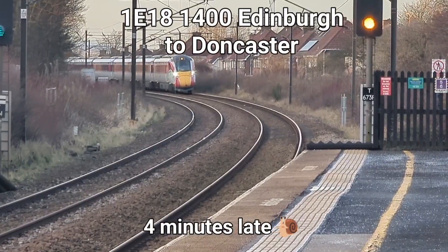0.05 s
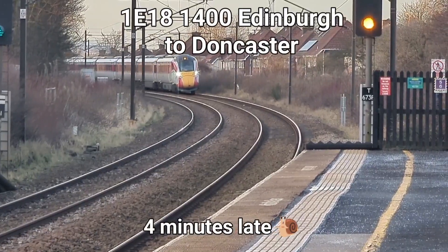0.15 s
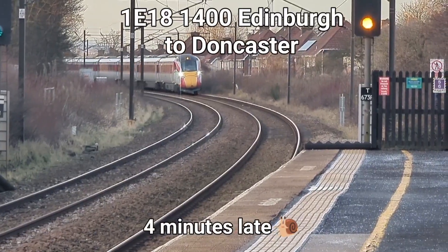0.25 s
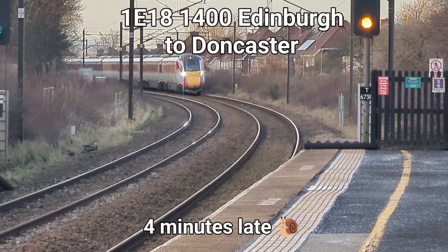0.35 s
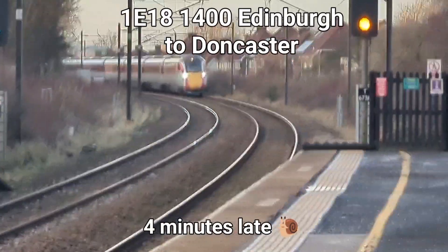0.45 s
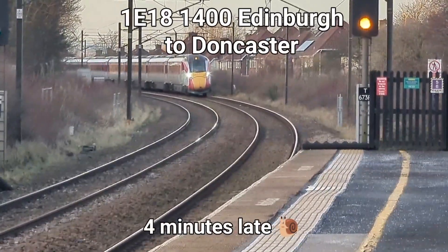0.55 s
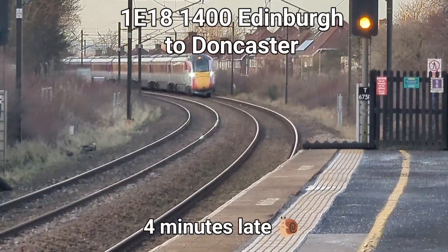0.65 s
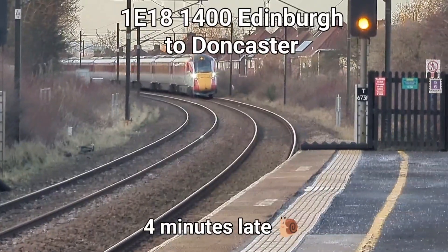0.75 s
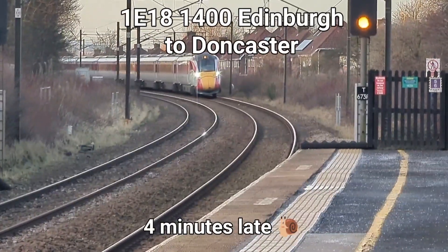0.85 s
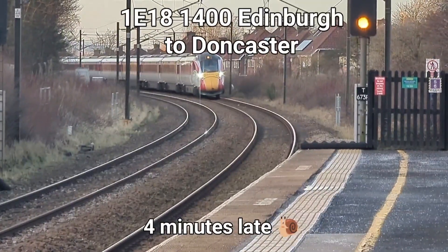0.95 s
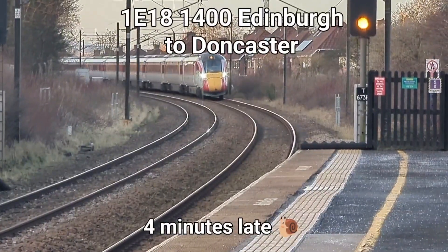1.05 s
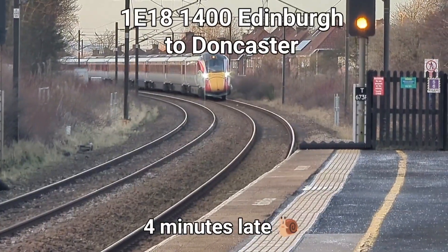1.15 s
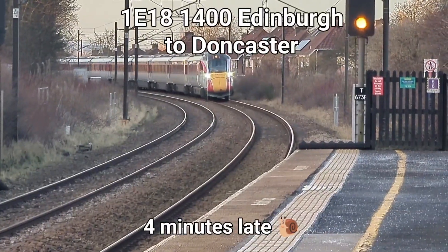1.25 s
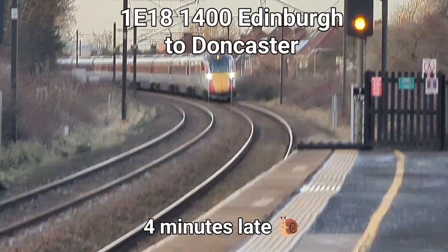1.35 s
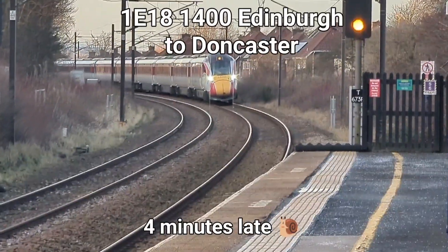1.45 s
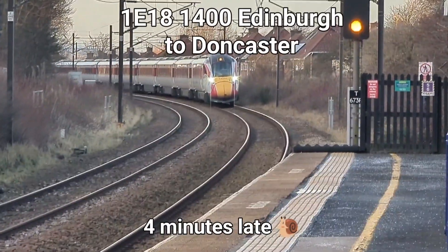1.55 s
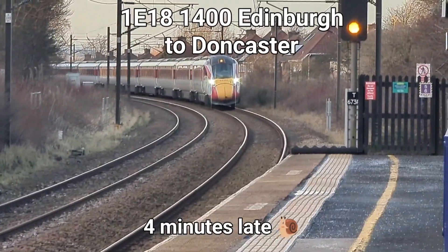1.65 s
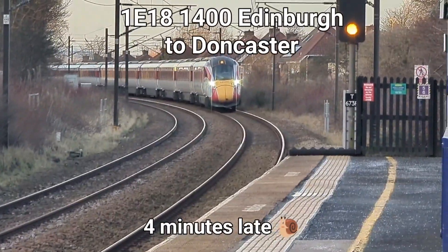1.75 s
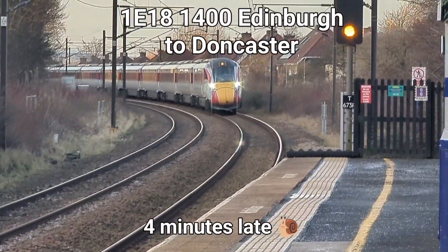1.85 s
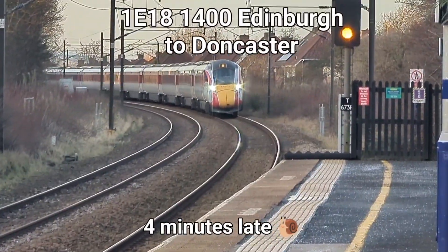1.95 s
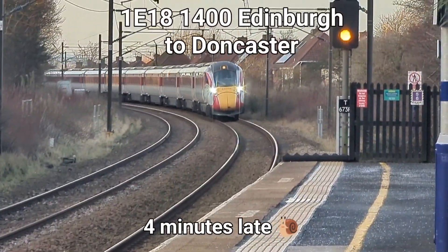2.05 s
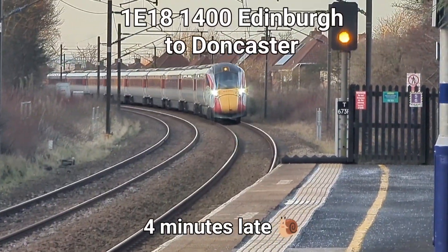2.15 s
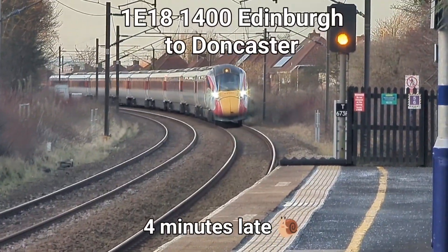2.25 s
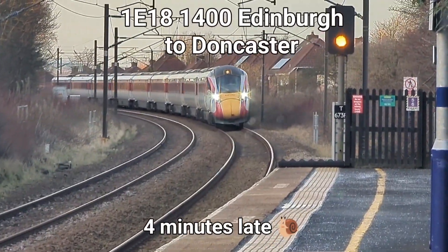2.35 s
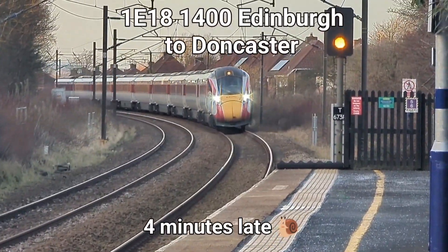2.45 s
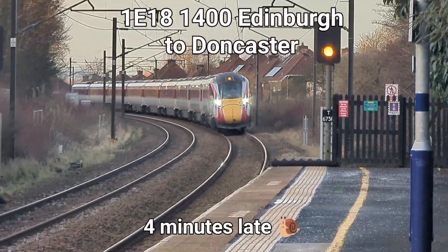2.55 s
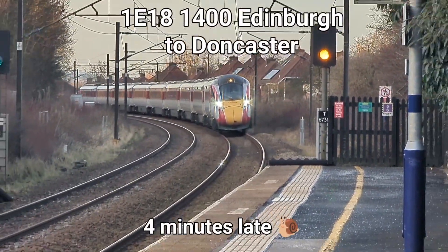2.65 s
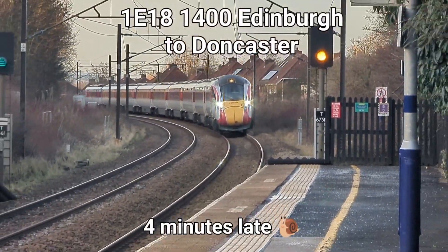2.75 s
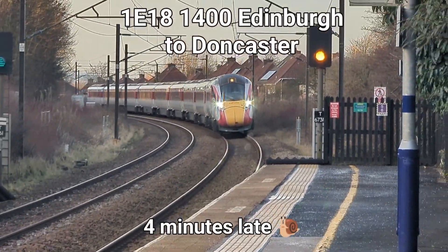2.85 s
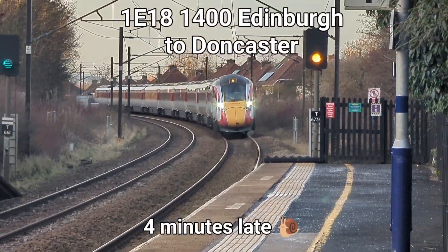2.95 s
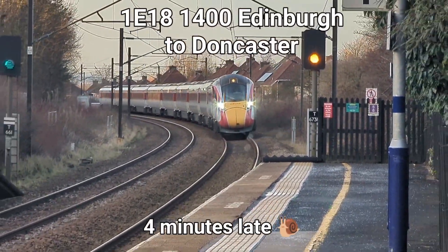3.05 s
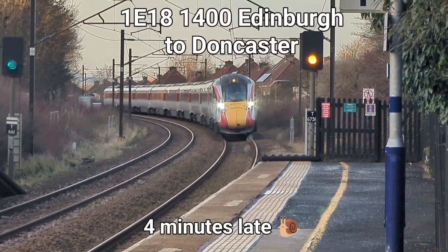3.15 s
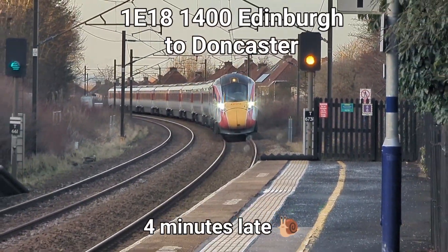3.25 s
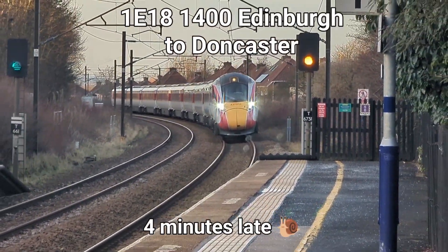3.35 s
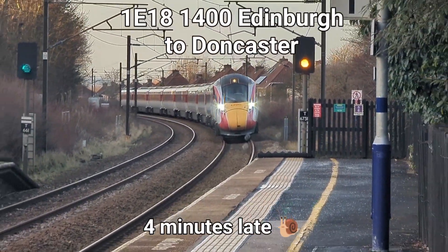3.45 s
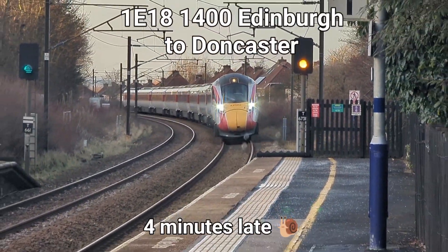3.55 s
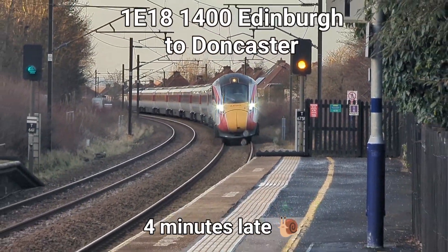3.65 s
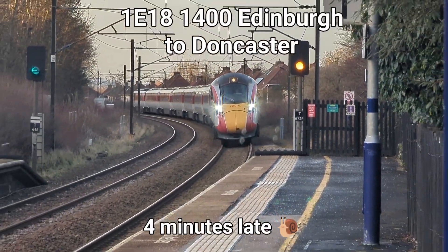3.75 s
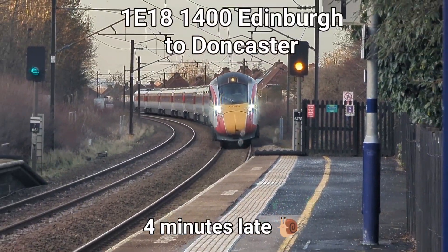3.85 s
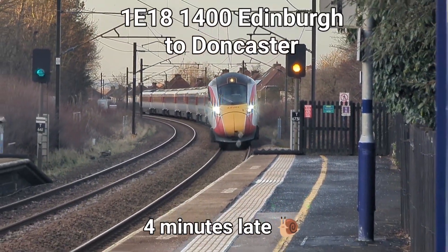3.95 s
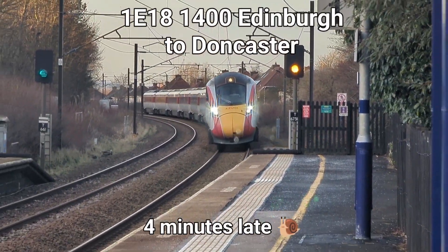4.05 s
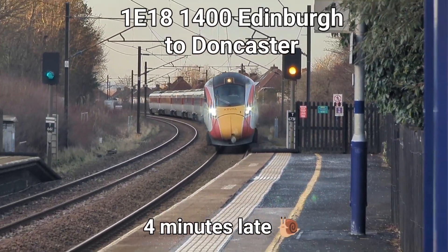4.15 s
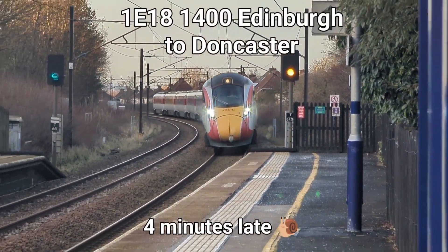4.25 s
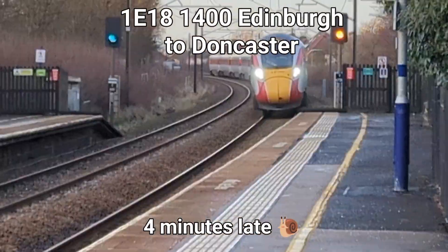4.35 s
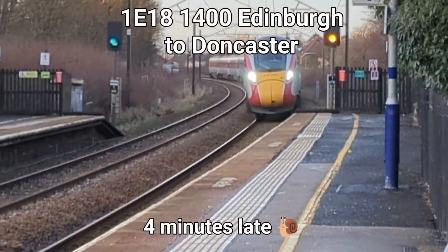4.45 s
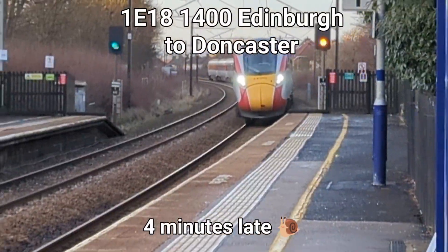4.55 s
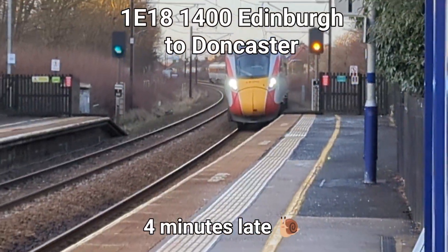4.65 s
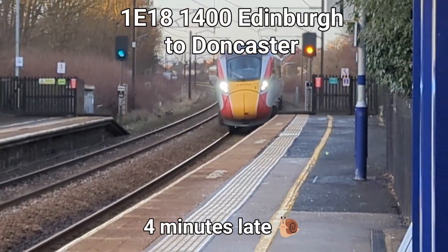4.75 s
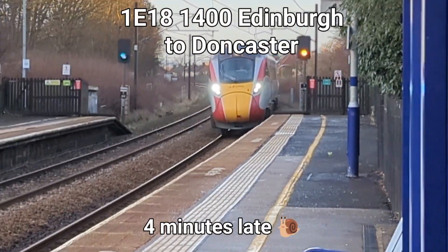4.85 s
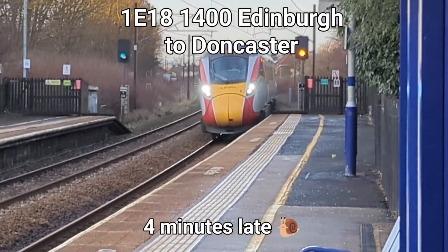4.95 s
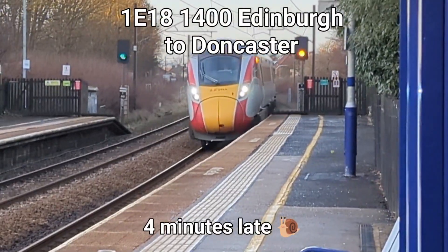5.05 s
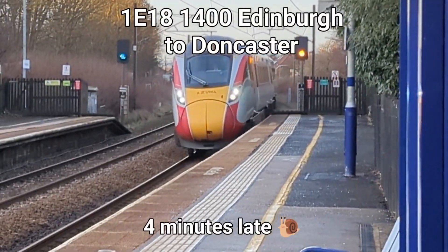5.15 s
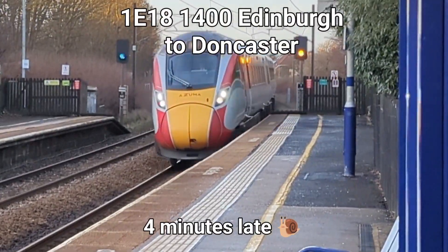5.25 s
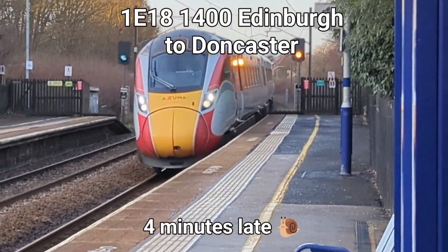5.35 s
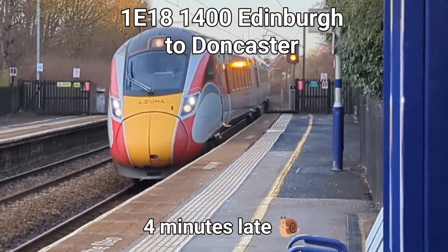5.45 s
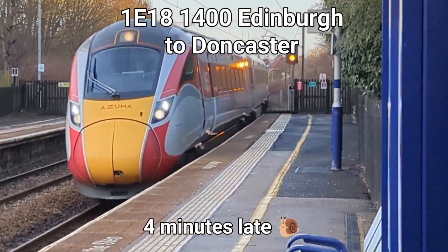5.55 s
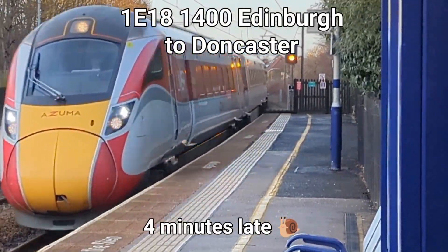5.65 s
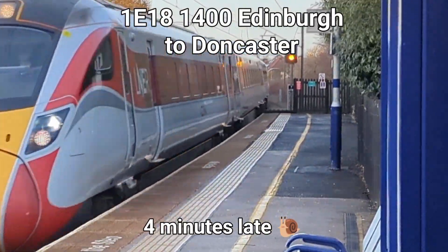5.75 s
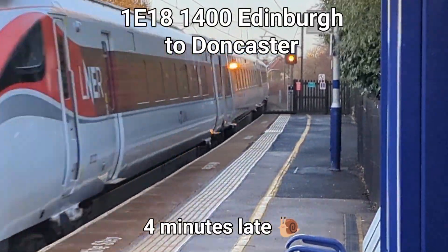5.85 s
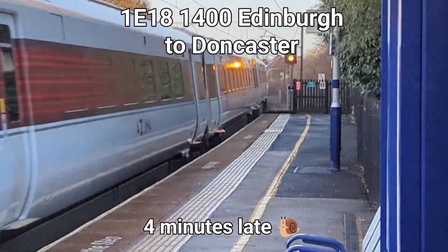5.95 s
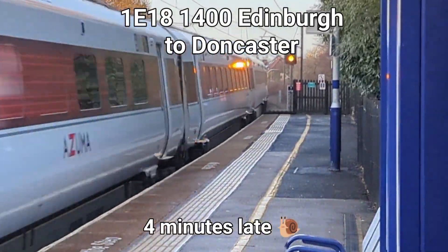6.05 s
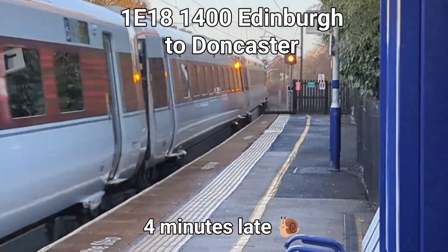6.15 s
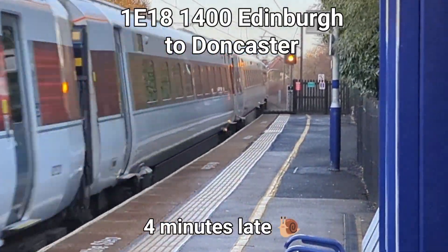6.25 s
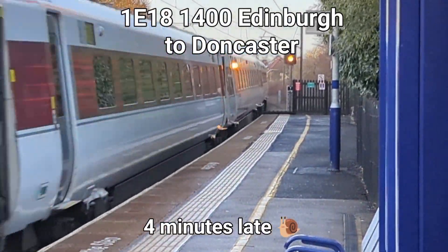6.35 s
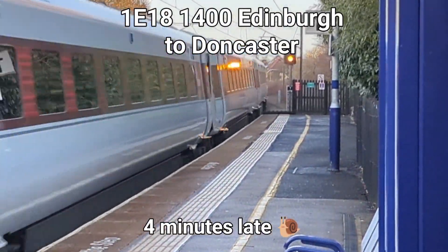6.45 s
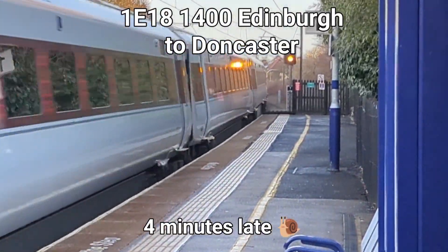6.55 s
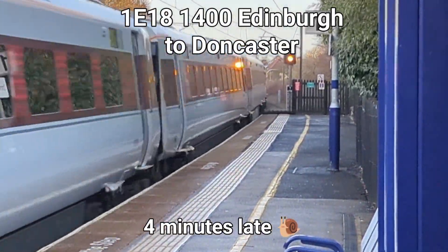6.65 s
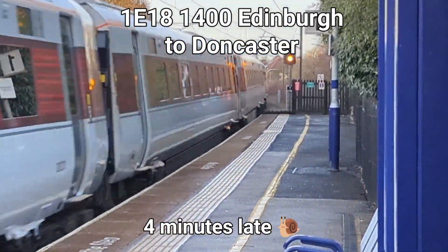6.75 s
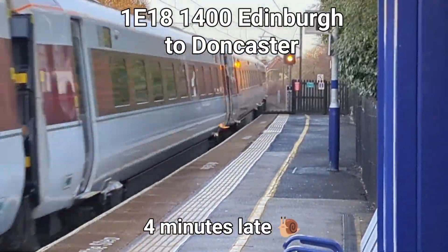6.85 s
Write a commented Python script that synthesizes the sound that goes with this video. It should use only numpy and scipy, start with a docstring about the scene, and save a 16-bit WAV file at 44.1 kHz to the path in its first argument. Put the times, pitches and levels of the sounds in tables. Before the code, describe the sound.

On an outdoor station platform, a phone picks up two steady hums around 250 Hz, beating about seven times a second, over faint low wind and a far train. A sharp dry tick falls at 0.4 s, smaller ones follow; a tiny bird whistles downward near 0.9 s and trills softly from 1.2 to 1.9 s. At 2.3 s the distant rumble suddenly opens up, clearer. Thin high rail singing emerges, strengthening from 3.5 s; the bird glides again at 3.7 and 3.9 s. Hiss and wheel roar climb steeply, with deep gusts from 4 s and brief metallic rings after 5 s. Around 5.7-5.8 s the nose passes in a broad whoosh with two hard knocks. Until nearly 7 s coaches rush alongside: loud roar, bright steely hiss swelling with the wheels, heavy bass buffets and short rings sagging in pitch. It ends with the train still passing.

```python
"""An express train runs through a station, close to a phone on the platform.
Two fans hum and beat throughout as sines; low air rumbles, early on as wind buffeting the phone.
Short noise blows tick near the phone and a bird whistles in glides. The rails, narrow noise resonances,
sing ahead of the train; its distant sound suddenly opens up, probably the phone's audio zoom.
Then the nose whooshes by, wheels roar, steel hisses, and wheels and track ring, all shaped noise."""
import sys
import numpy as np
from scipy import signal
from scipy.fft import rfft, irfft
from scipy.io import wavfile
from scipy.ndimage import uniform_filter1d, minimum_filter1d

SR = 44100
rng = np.random.default_rng(int(sys.argv[2]) if len(sys.argv) > 2 else 0)


def store_pcm(level_fs):
    """Save levels as 16-bit WAV."""
    pcm = np.round(np.clip(level_fs, -1, 1) * 32767).astype(np.int16)
    wavfile.write(sys.argv[1], SR, np.atleast_2d(pcm).T)


N = 304290
T = np.arange(N) / SR
F = np.maximum(np.fft.rfftfreq(N, 1 / SR), 1)

# Where the train is. Each row: time in seconds, nearness (0 far off, 1 approaching, 2 alongside).
NEARNESS = [(0, 0.025), (2.28, 0.083), (2.4, 0.57), (4.0, 0.89), (5.4, 1.043), (5.95, 1.9), (6.9, 1.94)]
# Likeness of the two microphone ports, train ahead and alongside.
# Each row: frequency in Hz, in-phase share, share with left leading.
PORTS_AHEAD = [(60, 1, 0.076), (282, 0.97, -0.075), (520, 0.82, -0.092), (770, 0.78, 0.19),
               (990, 0.1, -0.08), (1220, -0.12, 0.62), (1500, 0.39, 0.89), (1850, 0.35, -0.081),
               (2230, 0.55, 0.17), (2860, -0.23, 0.85), (3500, 0.045, 0.43), (4590, 0.64, -0.28),
               (7550, 0.029, 0.0006)]
PORTS_BESIDE = [(60, 1, 0.084), (275, 0.96, 0.16), (523, 0.57, 0.19), (790, 0.098, 0.21),
                (1050, -0.29, 0.17), (1210, -0.88, 0.46), (1500, -0.25, 0.25), (1850, 0.31, 0.1),
                (2180, 0.65, 0.14), (2720, -0.47, 0.099), (3500, 0.15, 0.18), (4600, -0.26, 0.17),
                (7500, 0.055, 0.1)]
ARRIVES_S = 5.7  # the nose draws level


def undb(db):
    """Decibels to gain."""
    return 10 ** (np.asarray(db) / 20)


def unit(x):
    """Scale to rms 1."""
    return x / np.sqrt(np.mean(x ** 2))


def curves(table):
    """Each column of a time table, sample by sample."""
    s, *columns = np.transpose(table)
    return [np.interp(T, s, c) for c in columns]


def over_hz(table):
    """Each column of a frequency table, bin by bin, linear over log frequency."""
    hz, *columns = np.transpose(table)
    return [np.interp(np.log(F), np.log(hz), c) for c in columns]


def colour(table):
    """Gain per bin of a dB spectrum."""
    return undb(over_hz(table)[0])


def band(lo_hz, hi_hz, order=20, bins=F):
    """Gain of a steep band-pass."""
    low_cut = 1 + (lo_hz / bins) ** order
    high_cut = 1 + (bins / hi_hz) ** order
    return (low_cut * high_cut) ** -.5


def resonance(hz, width_hz):
    """Gain of a resonance with steep skirts."""
    return 1 / (1 + ((F - hz) / width_hz) ** 2 * 2)


def bell(s, half_s):
    """A swell that peaks at time s."""
    return np.exp(-((T - s) / half_s) ** 2)


def walk(rate_hz):
    """Smooth chance of rms 1 that changes about rate_hz times a second."""
    smooth = rfft(rng.standard_normal(N)) / (1 + (F / rate_hz) ** 4)
    return unit(irfft(smooth, N))


def power_sum(*levels_db):
    """Level of unrelated sounds heard together."""
    return 20 * np.log10(np.sqrt(sum(undb(db) ** 2 for db in levels_db)))


def add(out, s, sound):
    """Mix a short sound in at time s."""
    part = out[int(s * SR):][:len(sound)]
    part += sound[:len(part)]


def field(gain, ports):
    """Coloured noise at both ports, partly alike and partly out of step; their mean has rms 1."""
    same, leading = over_hz(ports)
    likeness = same - 1j * leading
    likeness = likeness / np.maximum(np.abs(likeness), 1)
    left, other = rfft(rng.standard_normal((2, N)))
    right = likeness * left + np.sqrt(np.maximum(1 - np.abs(likeness) ** 2, 0)) * other
    mean_gain = np.sqrt(np.maximum(1 + same, .1))
    pair = irfft(np.array([left, right]) * gain / mean_gain, N)
    return pair / pair.mean(0).std()


def approach(far, ahead, beside):
    """Noise whose colour and width crossfade as the train draws near."""
    near, = curves(NEARNESS)
    stages = field(far, PORTS_AHEAD), field(ahead, PORTS_AHEAD), field(beside, PORTS_BESIDE)
    return sum(np.sqrt(np.clip(1 - np.abs(near - k), 0, 1)) * x for k, x in enumerate(stages))


def steady(x, size):
    """Take the slow swells out of a noise; size is in samples."""
    return x / np.sqrt(uniform_filter1d(x.mean(0) ** 2, size) + 1e-9)


def echoes(echo_db, count=8):
    """Spectral ripple that early reflections from platform, fence and coach sides leave."""
    lags_s = rng.uniform(.004, .03, count)
    return np.abs(1 + undb(echo_db) * np.exp(-2j * np.pi * lags_s[:, None] * F).sum(0))


def past_opening():
    """0 before the distant sound opens up, 1 after it; probably the phone's audio zoom."""
    opening_s, opening_length_s = 2.31, 0.067
    return np.clip((T - opening_s) / opening_length_s + .5, 0, 1)


def passing(far_db, opening_db, beside_db, doubling_db, bump_db, bump_s, bogie_db):
    """Train level: rises per halving of distance, rises or dips around bump_s, ripples once a coach."""
    speed_m_s, track_m, coach_m = 57, 19.5, 25.9
    bump_half_s, ripple_origin_s = 0.4, 4.5  # the origin sets the phase of the coach ripple
    distance_m = np.hypot(speed_m_s * np.maximum(ARRIVES_S - T, 0), track_m)
    bogies = np.cos(2 * np.pi * (T - ripple_origin_s) * speed_m_s / coach_m)
    bogies = bogies * np.clip((T - ARRIVES_S) / bump_half_s + 1, 0, 1)
    train_db = beside_db - doubling_db * np.log2(distance_m / track_m)
    train_db = train_db + bump_db * bell(bump_s, bump_half_s) + bogie_db * bogies
    return power_sum(far_db, train_db) - opening_db * (1 - past_opening())


def along_rail(full_db, rise_db_per_s, full_s):
    """Rails damp sound evenly per metre, so its level climbs evenly in dB as the wheels close in."""
    return full_db - rise_db_per_s * np.maximum(full_s - T, 0)


def fans():
    """Two fans at nearly the same speed: their blade tones beat about seven times a second."""
    # Blade tones. Each row: time in seconds, pitch of either fan in Hz.
    fan_pitch = [(0, 248.35, 255.02), (1.5, 248.35, 255.02), (2, 248.35, 255.33), (3.5, 248.35, 255.33),
                 (4, 248.35, 255.02)]
    # Mean rms levels. Each row: time in seconds, level of either fan in dB.
    fan_levels = [(0, -41, -35.5), (0.601, -37.5, -35.5), (1.2, -46, -35), (1.7, -38, -37),
                  (2.2, -40.5, -34.5), (2.8, -36.5, -39), (3.5, -34, -36), (5, -32.5, -39.5)]
    in_step_s = .11  # both swing together, but for the wander
    lag_s = np.array([[0], [.00018]])  # the right port hears them later
    out = 0
    for hz, db in zip(curves(fan_pitch), curves(fan_levels)):
        phase = 2 * np.pi * (np.cumsum(hz) / SR - hz * (in_step_s + lag_s)) + 0.27 * walk(5.1)
        out = out + np.sqrt(2) * undb(db + 0.78 * walk(2.0)) * np.cos(phase)
    return out


def trill(count):
    """Short rising notes, on average each lower and softer, scattered in pitch and strength."""
    start_s, step_s, note_s = 1.24, .088, .032
    first_hz, rise_hz, sag_hz, scatter_hz = 5950, 750, 60, 120
    first_db, fade_db, scatter_db = -60.5, 1.5, 3
    notes = []
    for k, (off, strength) in enumerate(rng.standard_normal((count, 2))):
        hz = first_hz - k * sag_hz + scatter_hz * off
        db = first_db - k * fade_db + scatter_db * strength
        notes.append((start_s + k * step_s, note_s, hz, hz + rise_hz, db))
    return notes


def bird():
    """Thin gliding notes of a small bird, with a short scatter from the fence and trees."""
    # Whistles. Each row: start in seconds, length in seconds, start and end pitch in Hz,
    # peak level in dB ahead of the direct/scatter mix.
    whistles = [(0.867, 0.07, 8720, 8370, -61), (1.045, 0.097, 8600, 8150, -57),
                (1.09, 0.043, 7550, 7900, -56), (3.702, 0.11, 8750, 7950, -52),
                (3.93, 0.077, 8650, 8200, -51)]
    song = np.zeros(N)
    for s, length_s, start_hz, end_hz, db in whistles + trill(count=8):
        u = np.linspace(0, 1, int(length_s * SR))
        phase = 2 * np.pi * np.cumsum(start_hz + (end_hz - start_hz) * u) / SR
        swell = np.sqrt(np.abs(np.sin(np.pi * u)))
        add(song, s, undb(db) * swell * np.sin(phase))
    tail = rng.standard_normal((2, SR // 2)) * np.exp(-T[:SR // 2] / 0.056)
    tail = tail / np.sqrt((tail ** 2).sum(1, keepdims=True))
    scatter = signal.fftconvolve(song[None], tail, axes=1)[:, :N]
    return 0.68 * song + 0.97 * scatter


def ticks(size=4096):
    """Short dry blows, band-passed decaying noise: ticks near the phone, then leading-bogie knocks."""
    # Each row: time in seconds, peak in dB, low and high band edge in Hz, 60 dB decay in seconds.
    blows = [(.4209, -18, 2300, 10500, .004), (.624, -37, 3000, 14500, .003),
             (.659, -31, 3000, 15000, .003), (1.449, -23, 400, 2000, .012), (2.003, -35, 2650, 3250, .01),
             (5.772, -12, 1900, 2350, .03), (5.821, -14, 870, 1150, .04)]
    out = np.zeros(N)
    t = (np.arange(size) - size // 2) / SR
    bins = np.maximum(np.fft.rfftfreq(size, 1 / SR), 1)
    for s, db, lo_hz, hi_hz, t60_s in blows:
        burst = rng.standard_normal(size) * (t >= 0) * undb(-60 * np.abs(t) / t60_s)
        burst[size // 2] += 5  # the sharp first contact
        blow = irfft(rfft(burst) * band(lo_hz, hi_hz, order=14, bins=bins), size)
        add(out, s + t[0], undb(db) * blow / np.abs(blow).max())
    return out


def rails():
    """Waves run far ahead of the wheels in the rails, which sing in narrow resonances."""
    # Main whine. Each row: time in seconds, level in dB ahead of screening and flicker.
    whine_levels = [(1.9, -93), (2.43, -80), (3.51, -67), (3.56, -51.5), (3.83, -53), (3.88, -63),
                    (4.0, -49.5), (4.75, -44.5), (5.3, -42), (5.9, -49)]
    # Upper partials. Each row: pitch in Hz, width in Hz, relative power in dB.
    partials = [(4260, 70, -1), (4900, 80, -5), (6900, 70, -7), (7980, 110, -1), (8660, 60, -2),
                (9320, 85, 1), (9970, 55, -5), (10660, 75, -3), (11300, 75, 2), (11985, 65, 0),
                (12680, 75, -4), (13310, 55, 0), (13960, 55, -2), (14620, 65, -3), (15300, 50, -13)]
    whine_db, = curves(whine_levels)
    near, = curves(NEARNESS)
    covered = np.clip(near - 1, 0, 1)  # the coaches screen the main whine once alongside
    whine = steady(field(resonance(7330, width_hz=26), PORTS_AHEAD), size=4000)
    whine = whine * undb(whine_db - 5.2 * covered + 2.8 * walk(22))

    upper_db = along_rail(full_db=-43, rise_db_per_s=10, full_s=5.12) - 6 * (1 - past_opening())
    comb = np.sqrt(sum((undb(db) * resonance(hz, width)) ** 2 / width for hz, width, db in partials))
    # the highest partials lead at first; the lower ones take over as the train comes closer
    lead_db = np.interp(T, [2.6, 4.4], [1.5, -1.5])
    high = field(comb * band(11800, 16000), PORTS_AHEAD) * undb(lead_db + 2 * walk(9))
    low = field(comb * band(4000, 13600), PORTS_AHEAD) * undb(-lead_db + 2 * walk(13))
    return whine + (high + low) * undb(upper_db)


def gusts():
    """Gusts of low rumble: each is a few wavering cycles of a deep boom that swell and die."""
    # Each row: middle in seconds, length in seconds, rms level at the peak in dB.
    gust_list = [(.66, 0.07, -31), (2.395, 0.14, -29), (2.806, 0.04, -28), (3.277, 0.13, -31.5),
                 (3.79, 0.21, -25), (4.053, 0.059, -24), (4.393, .08, -24.5), (4.537, 0.068, -22.5),
                 (4.807, 0.15, -23), (4.97, 0.064, -27), (5.084, 0.052, -15.5), (5.42, 0.042, -17),
                 (5.552, 0.044, -16.5), (6.005, 0.059, -9), (6.189, 0.079, -10.5), (6.437, .05, -13),
                 (6.563, 0.09, -15), (6.723, .06, -12), (6.84, .05, -17)]
    pitch_hz, wander_hz = 53.83, 6.98
    swell = sum(undb(db) * np.exp(-2 * ((T - s) / length_s) ** 2) for s, length_s, db in gust_list)
    phase = 2 * np.pi * np.cumsum(pitch_hz + wander_hz * walk(25)) / SR
    return np.sqrt(2) * swell * np.sin(phase)


def air():
    """Low rumble: wind buffeting the phone early, then air shoved by the train, and eddies along coaches."""
    # Colour. Each row: frequency in Hz, relative density in dB per Hz ahead, the same alongside.
    air_colour = [(20, -43, -40), (30, -36, -25), (39.3, -5, -15), (55.2, 14.5, 3.5), (68, 0.5, -5),
                  (90.6, -12.5, -3.5), (111.5, -16.5, -10.5), (158.3, -7, -7.5), (183.5, -12.5, -15),
                  (225, -8, -9.5), (264, -17, -17), (420, -18, -17)]
    rumble_db = passing(far_db=-36.5, opening_db=1.5, beside_db=-19.5, doubling_db=13.5,
                        bump_db=4.0, bump_s=6.5, bogie_db=0.0)
    rush_db = passing(far_db=-40, opening_db=1.5, beside_db=-18.5, doubling_db=9.5,
                      bump_db=3.5, bump_s=6.01, bogie_db=-0.5)
    ahead, beside = undb(over_hz(air_colour))
    low, high = band(15, 109), band(80.7, 402)
    rumble = steady(approach(ahead * low, ahead * low, beside * low), size=3600)
    rumble = rumble * undb(rumble_db + 2.5 * walk(21))
    eddies = steady(approach(ahead * high, ahead * high, beside * high), size=5000)
    eddies = eddies * undb(rush_db + 0.87 * walk(7.3))
    return rumble + gusts() + eddies


def bow_wave():
    """The nose pushes a broad whoosh of air past the platform."""
    # Each row: frequency in Hz, relative density in dB per Hz.
    bow_colour = [(300, 0), (500, 0.5), (750, -5), (1050, -4), (1550, -8.5), (2100, -16), (3000, -20),
                  (4500, -18.5)]
    whoosh = field(colour(bow_colour) * band(250, 4000, order=8), PORTS_AHEAD)
    return steady(whoosh, size=4000) * undb(-20) * bell(s=5.83, half_s=0.25)


def hiss():
    """The contact patches hiss, flickering as they run over the rail head."""
    # Colour. Each row: frequency in Hz, relative density in dB per Hz.
    hiss_far = [(3000, 10.5), (4200, 3.0), (5600, -3.5), (7000, -4), (9500, -16.0), (12000, -12.5), (15500, -10)]
    hiss_ahead = [(3000, 12.5), (4000, 8.5), (5100, 6.5), (5700, 0), (7000, 5), (8300, 6.5), (9300, 2),
                  (10100, -3), (11500, 3.5), (13000, -9), (15500, -26)]
    hiss_beside = [(3000, 1.5), (4000, -1), (5000, -1.5), (5600, -4), (6600, 2.5), (8300, 2), (9400, 6.5),
                   (9900, -1.5), (11600, 3), (13200, -3.5), (15500, -10.5)]
    # Swells as bogies go by. Each row: middle in seconds, half length in seconds, rise in dB.
    swells = [(5.96, 0.055, 1), (6.47, 0.14, 2.5), (6.874, .04, 1.5)]
    far_db = -61 + 3 * past_opening()
    hiss_db = power_sum(far_db, along_rail(full_db=-26.5, rise_db_per_s=11, full_s=6.086))
    hiss_db = hiss_db + sum(db * bell(s, half_s) for s, half_s, db in swells)
    top = band(2590, 17000) * echoes(echo_db=-20.0)
    noise = approach(colour(hiss_far) * top, colour(hiss_ahead) * top, colour(hiss_beside) * top)
    return noise * undb(hiss_db + .5 * walk(33))


def wheels():
    """Rough treads shake track and wheels; close by, the track booms and the wheel discs ring."""
    # Colour far off, approaching, alongside. Each row: frequency in Hz, relative density in dB per Hz.
    wheel_far = [(160, -40), (280, -19), (327, 18.5), (381, -20), (433, -0.5), (480, -1), (761, -0.5),
                 (865, -5.5), (2040, -7.5), (2670, -21.5), (6000, -59), (7800, -66), (13200, -120)]
    wheel_ahead = [(160, -47), (280, -7), (322, 19.5), (357, -2), (499, -4), (574, -6.5), (678, -1.5),
                   (984, -7.5), (1130, -12), (1800, -5.5), (2100, -2.5), (2960, -18), (4030, -28),
                   (4350, -22), (6000, -33), (7800, -69), (13200, -120)]
    wheel_beside = [(160, -34), (280, 4), (335, 18), (376, -22), (456, -3), (567, -6), (752, -2),
                    (812, -19), (899, -5), (1090, -13.5), (1580, -16), (2100, -9), (2850, -19), (5560, -36),
                    (6000, -27), (7800, -57), (13200, -120)]
    roar_db = passing(far_db=-41.5, opening_db=3.5, beside_db=-20.0, doubling_db=7.0,
                      bump_db=1.0, bump_s=5.13, bogie_db=1.6)
    ring_db = passing(far_db=-47.5, opening_db=3.5, beside_db=-24.0, doubling_db=7.0,
                      bump_db=-1.0, bump_s=5.3, bogie_db=0.9)
    far, ahead, beside = colour(wheel_far), colour(wheel_ahead), colour(wheel_beside)
    modes = .6 * resonance(784, 40) + 0.24 * resonance(640, 30)
    modes = modes + 0.57 * resonance(795, 25) + 0.32 * resonance(2100, 80)
    beside = beside * (1 + modes)
    station = echoes(echo_db=-21.0)
    low, high = band(423, 1407) * station, band(1340, 2740) * station
    roar = steady(approach(far * low, ahead * low, beside * low), size=5000)
    ring = steady(approach(far * high, ahead * high, beside * high), size=5000)
    return roar * undb(roar_db + 1.45 * walk(25)) + ring * undb(ring_db + 1.15 * walk(25))


def wheel_rings():
    """Wheels and track ring up in short swells, sagging in pitch, as the train comes close and passes."""
    # Each row: middle in seconds, half length in seconds, pitch in Hz, level at the peak in dB.
    rings = [(5.097, 0.13, 1400, -35), (5.343, 0.097, 694, -26), (5.48, 0.067, 2200, -28.5),
             (5.665, 0.065, 1630, -27.5), (5.757, 0.11, 2170, -25.5), (5.806, 0.1, 983, -26.5),
             (5.965, 0.029, 2150, -21.5), (6.017, 0.064, 730, -21), (6.057, .04, 990, -32),
             (6.308, .05, 726, -23), (6.386, 0.027, 328, -22), (6.471, 0.19, 2130, -27),
             (6.496, 0.081, 725, -19.5), (6.651, 0.065, 2010, -26), (6.853, .05, 2090, -27),
             (6.865, 0.062, 755, -17)]
    width_share, sag_per_s = 0.087, .25  # width and fall of pitch, as shares of the pitch
    out = 0
    for s, half_s, hz, db in rings:
        ports = PORTS_AHEAD if s < ARRIVES_S else PORTS_BESIDE
        ring = steady(field(resonance(hz, width_share * hz), ports), size=3000)
        doppler_s = T - sag_per_s * (T - s) ** 2 / 2
        sagging = np.array([np.interp(doppler_s, T, port) for port in ring])
        out = out + undb(db) * bell(s, half_s) * sagging
    return out


def scene():
    """The small sounds of the station, the singing rails and the train."""
    station = fans() + bird() + ticks()
    train = air() + bow_wave() + hiss() + wheels() + wheel_rings()
    return station + rails() + train


def record(dry):
    """The phone drops the deepest bass, its limiter ducks peaks near full scale, and the top is cut."""
    sound = irfft(rfft(dry) * band(31, SR, order=14), N)
    headroom = np.minimum(1, .98 / (np.abs(sound).max(0) + 1e-9))
    gain = uniform_filter1d(minimum_filter1d(headroom, size=301), size=301)
    top_cut = signal.ellip(10, .1, 80, 15400, fs=SR, output="sos")  # ripple and stop in dB, edge in Hz
    return signal.sosfilt(top_cut, sound * gain)


dry = scene()
out = record(dry)
store_pcm(out)
```